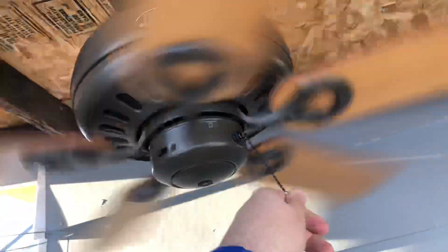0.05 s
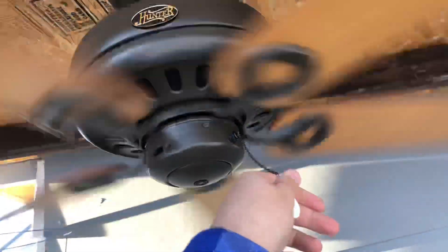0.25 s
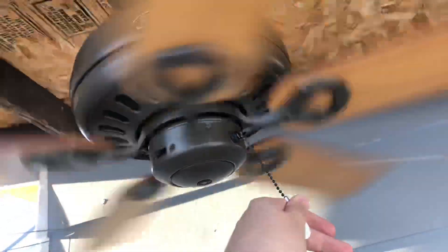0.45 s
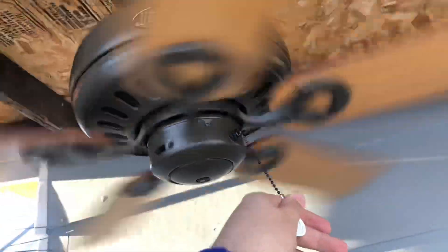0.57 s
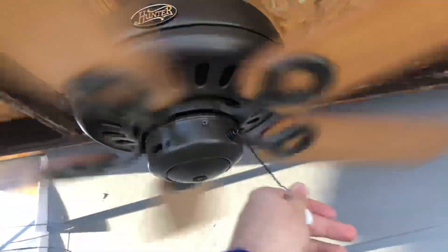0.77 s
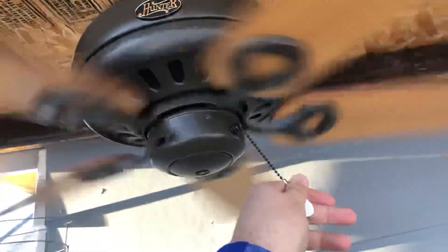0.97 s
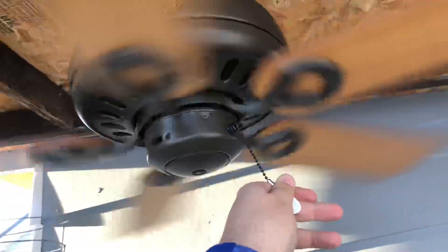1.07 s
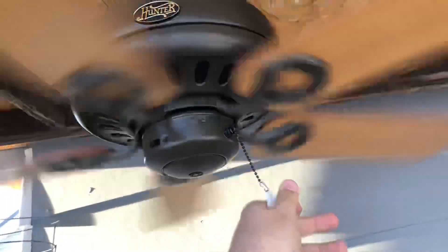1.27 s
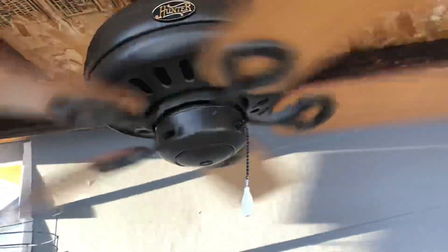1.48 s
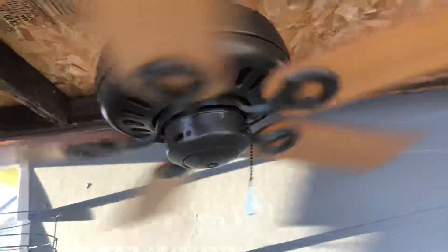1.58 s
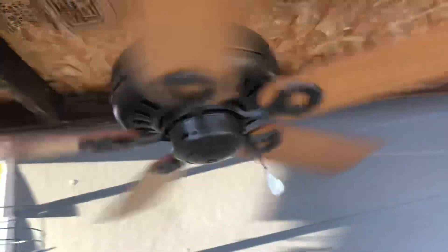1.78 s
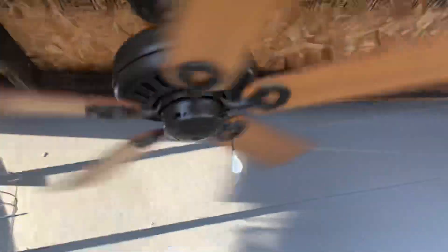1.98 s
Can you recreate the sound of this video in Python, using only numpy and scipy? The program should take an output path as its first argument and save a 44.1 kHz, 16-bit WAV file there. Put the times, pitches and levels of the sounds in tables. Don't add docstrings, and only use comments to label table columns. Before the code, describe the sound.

A ceiling fan's bead pull chain is tugged close by: bright ticks and a hard switch snap at 0.1 s, chain rattling back at 0.33-0.41, ticks from 0.5, the loudest snap near 0.67, another rattle around 0.8, a last snap at 1.03. Low draught buffets the microphone, strongest early, over steady blade hiss. Faint ticks and far bird peeps follow after 1.5, with a soft sleeve brush at 1.9.

```python
import sys
import numpy as np
from scipy import signal
from scipy.fft import irfft
from scipy.io import wavfile
from scipy.ndimage import uniform_filter1d

SR = 44100
rng = np.random.default_rng(int(sys.argv[2]) if len(sys.argv) > 2 else 0)


def materialize(psi):
    bounded = np.clip(np.atleast_2d(psi).T, -1, 1)
    quanta = np.round(bounded * 32767).astype(np.int16)
    wavfile.write(sys.argv[1], SR, quanta)


def decibels_to_gain(level_db):
    exponent = np.asarray(level_db, float) / 20
    return 10 ** exponent


N = 89743


def evened(x):
    return x / np.sqrt(np.mean(x ** 2) + 1e-20)


def read(points, hz):
    f, value = np.transpose(points)
    return np.interp(np.log(hz + 1), np.log(f + 1), value)


def follow(points, t):
    s, value = np.transpose(points)
    return np.interp(t, s, value)


def add(mix, s, sound):
    at = round(s * SR)
    sound = sound[max(-at, 0):]
    part = mix[max(at, 0):][:len(sound)]
    part += sound[:len(part)]


def noise(spectrum, size, patch_db, flicker_db):
    frames, hz = 4 * N // size + 5, np.fft.rfftfreq(size, 1 / SR)
    a, b, patches = rng.standard_normal((frames, len(hz), 3)).T
    patches = uniform_filter1d(patches, size=9, axis=0)
    patches = evened(uniform_filter1d(patches, size=7, axis=1))
    flicker = evened(uniform_filter1d(rng.standard_normal(frames), size=3))
    level_db = read(spectrum, hz)[:, None] + patch_db * patches + flicker_db * flicker
    z = (a + 1j * b) * decibels_to_gain(level_db)
    return evened(signal.istft(z, nperseg=size, noverlap=3 * size // 4)[1][:N])


def eddy(hz, cycles):
    half = max(abs(cycles), 4 / 3) / hz
    t = np.arange(-half, half, 1 / SR)
    swirl = np.cos(2 * np.pi * hz * t)
    bell = np.exp(-8 * (t / half) ** 2)
    balanced = swirl - swirl @ bell / bell.sum()
    return half, np.sign(cycles) * balanced * bell


def small_eddies():
    eddies_per_s = 150
    size = decibels_to_gain(0.74 * np.minimum(rng.exponential(1, N), 3))
    size *= rng.random(N) < eddies_per_s / SR
    size *= rng.choice([-1., 1.], N)
    kind = rng.integers(0, 8, N)
    out = np.zeros(N)
    for k, hz in enumerate(np.geomspace(70, 600, 8)):
        out += signal.oaconvolve(size * (kind == k), eddy(hz, 1.53)[1], "same")
    return evened(out)


# [f/Hz, level/dB per Hz]
LUMP_COLOUR = [(12, -47), (20, 3.5), (76, -2.5), (172, -7), (409, -15), (536, -23), (690, -20), (888, -23),
               (1500, -34.5), (1950, -38.5), (3300, -120)]
# [t/s, level/dB]
DRAUGHT_LEVEL = [(0, -32), (.04, -36.5), (.062, -30.5), (.09, -34.5), (.13, -34), (.15, -27), (.2, -31),
                 (.235, -38.5), (.36, -40), (.4, -34), (.56, -39.5), (.6, -41.5), (1.0, -39.5),
                 (1.2, -40.5), (1.45, -42.5), (1.65, -44.5), (1.76, -41), (2.03, -43.5)]
# [t/s, peak level/dB, f/Hz, cycles (negative = suction)]
STRONG_EDDIES = [(.001, -15.5, 250, -0.56), (0.013, -28.5, 150, -1), (0.053, -22.5, 107, 2.2),
                 (0.0593, -19.5, 372, 0.7), (0.0635, -14.5, 150, 0.5), (.072, -25.5, 102, -0.5),
                 (0.1377, -8.5, 239, -1.5), (0.1475, -20, 483, -2.8), (0.1503, -14.5, 120, 0.5),
                 (.16, -16, 725, 4), (0.1651, -18.5, 226, -1), (.1735, -12.5, 468, 2.34),
                 (0.154, -19, 200, -2.1), (0.1858, -17, 320, -1), (0.2013, -24, 252, -2),
                 (0.2093, -25, 110, -0.3), (0.3999, -23.5, 108, 1.2), (.414, -26.5, 252, 2),
                 (.424, -26, 197, 3), (0.4729, -26, 330, 1), (.477, -26, 450, 1.5),
                 (.481, -21.5, 127, -0.5), (0.507, -30, 200, -2.5), (.523, -29, 130, -0.5),
                 (.538, -31, 483, 3.5), (0.5572, -23.5, 144, -1.7), (0.686, -32.5, 390, 4.5),
                 (0.656, -31, 68.6, 1.5), (0.789, -28, 237, 3.4), (0.825, -25.5, 154, 2.2),
                 (0.939, -24.5, 249, -0.9), (.947, -26, 236, 2.9), (1.051, -32, 251, -1.5),
                 (1.062, -25, 88, 1.5), (1.197, -26.5, 200, 0.5), (1.23, -30, 100, 1.5),
                 (1.654, -37, 340, 5), (1.746, -29, 89, 2), (1.757, -26.5, 205, -1.5),
                 (1.777, -31, 128, -1.9), (1.856, -28.5, 148, 0), (1.913, -30, 195, 1.5),
                 (1.941, -25, 214, 1.8)]


def draught():
    lumps = noise(LUMP_COLOUR, size=2048, patch_db=1.2, flicker_db=-0.5)
    strength = decibels_to_gain(follow(DRAUGHT_LEVEL, np.arange(N) / SR))
    out = strength * (decibels_to_gain(1) * lumps + decibels_to_gain(-6) * small_eddies())
    for s, db, hz, cycles in STRONG_EDDIES:
        half, shape = eddy(hz, cycles)
        add(out, s - half, decibels_to_gain(db) * shape)
    return out


# [f/Hz, level/dB per Hz]
HISS_COLOUR = [(88, -8.5), (150, -3), (293, -2.5), (600, -9.5), (2260, -25), (6940, -36.5), (9500, -41),
               (12500, -49), (16500, -60)]
# [t/s, level/dB]
HISS_LEVEL = [(0, 2), (1.0, 1), (1.4, -0.16), (1.75, 0.25), (2.03, 2)]


def wash():
    hiss = noise(HISS_COLOUR, size=512, patch_db=1.5, flicker_db=0.6)
    return decibels_to_gain(-46.5 + follow(HISS_LEVEL, np.arange(N) / SR)) * hiss


def ringing(modes, t, luck):
    scatter_db, detune = 2, .012
    out = np.zeros(len(t))
    for k, (hz, level_db, t60) in enumerate(modes):
        fade = decibels_to_gain(level_db - 60 * t / t60 + scatter_db * luck[k])
        out += fade * np.sin(2 * np.pi * hz * (1 + detune * luck[20 + k]) * t)
    return out


# [f/Hz, level/dB per Hz]
CRACK_COLOUR = [(1000, 8.5), (2500, -8.5), (4000, 5), (5500, 2), (9000, -1), (11500, -12), (13000, -17),
                (16500, -16.5)]


def hit(modes, knock, crack_db, low_hz, db, chatter_s, knock_db, rattle_db, tilt_db):
    rattle_s, tilt_hz, grit = .012, 6000, 3.5
    t = np.arange(3000) / SR
    contact, luck, rough = np.split(rng.standard_normal(6040), [3000, 3040])
    fade_s = np.clip(chatter_s, 1 / 1000, 1 / 250)
    chatter = contact * np.exp(-t / fade_s) * np.minimum(t / 0.00011, 1)
    rattle = contact * decibels_to_gain(rattle_db) * np.exp(-t / rattle_s) * abs(rough)

    tilted = [(hz, level_db + tilt_db * np.log2(hz / tilt_hz), t60) for hz, level_db, t60 in modes]
    ring = ringing(tilted, t, luck) * (1 - np.exp(-t / fade_s))
    ring *= 1 + grit * uniform_filter1d(rough, size=30)

    hz = np.fft.rfftfreq(256, 1 / SR)
    tilt = tilt_db * np.log2(np.maximum(hz, tilt_hz / 2) / tilt_hz)
    gain = decibels_to_gain(read(CRACK_COLOUR, hz) + tilt) / (1 + (low_hz / (hz + 1)) ** 4)
    colour = np.roll(irfft(gain), 16)[:128]
    crack = signal.fftconvolve(chatter + rattle, colour)[:3000]

    blow = decibels_to_gain(knock_db + 7.5) * ringing(knock, t, luck[10:]) * np.minimum(t / 0.0027, 1)
    return decibels_to_gain(db - 10.5) * (ring / abs(ring).max() + decibels_to_gain(crack_db) * crack / abs(crack).max() + blow)


TICK_TIMES = [.0628, .0962, .218, .265, .4973, .549, .6115, .6539, .744, .9492, .9684, 1.0006, 1.5194,
              1.6544, 1.6854, 1.7894, 1.955, 1.993]
# [peak level/dB, tilt/dB per octave]
TICK_HITS = [(-35.5, 5), (-25, 8), (-59, 0), (-61, -0.5), (-67, 0), (-60, 2), (-37.5, 15), (-30, 6),
             (-51, -3), (-35.5, 13), (-50, 2), (-33, 3), (-47, 5), (-46, 2), (-49, 4), (-54, -1), (-52, 0),
             (-57, -3)]
# [f/Hz, level/dB, time to fade by 60 dB/s]
BEAD_RING = [(5710, 0, .014), (7620, -5, .008), (9000, -9, .004), (11000, -2, .005), (13600, -9, .003)]


def ticks():
    out = np.zeros(N)
    for s, (db, tilt_db) in zip(TICK_TIMES, TICK_HITS):
        add(out, s, hit(BEAD_RING, [], 2, 4340, db, chatter_s=0.0052, knock_db=0,
                        rattle_db=-17, tilt_db=tilt_db))
    return out


SNAP_TIMES = [.104, .1101, .1134, .1295, .6712, .6728, .6915, .7035, .7175, 1.0333, 1.0794]
# [peak level/dB, chatter/s, housing knock level/dB, rattle level/dB, tilt/dB per octave]
SNAP_HITS = [(-37, 0.0026, 0, -27, -19), (-16, 0.00087, -36, -38, 2.5), (-21.5, 0.0046, -3.5, -9, 6),
             (-28, 0.0024, -8, -14, -5), (-16, 0.00067, -5.5, -5, 6.5), (-11, 0.0018, -23, -29, 6),
             (-27.5, 0.0036, -8, -18, -4), (-36.5, .0015, 0, -20, -21), (-49, .0015, -20, -20, -3),
             (-14.5, 0.0035, -5.5, -34, 4.5), (-33, 0.0019, -5, -22, -16)]
# [f/Hz, level/dB, time to fade by 60 dB/s]
CAP_RING = [(2750, -6, .01), (3400, -4, .009), (4050, -5, .008), (5090, 0, .01), (5750, -4, .008),
            (6200, -6, .006), (6850, -2, .007), (7780, -3, .008), (8400, -2, .006), (9230, -10, .005),
            (10900, -9, .006)]
# [f/Hz, level/dB, time to fade by 60 dB/s]
SNAP_HOUSING = [(1180, -6, .02), (1620, -1, .028), (1500, -9, .015), (2000, -10, .012), (2650, -12, .014)]


def snaps():
    out = np.zeros(N)
    for s, row in zip(SNAP_TIMES, SNAP_HITS):
        add(out, s, hit(CAP_RING, SNAP_HOUSING, 5, 860, *row))
    return out


# [f/Hz, time to fade by 60 dB/s]
ECHO_TIME = [(1000, .08), (2000, .09), (4000, .14), (9000, .13), (16000, .09)]


def roof(x):
    blend_turns_per_s = 14
    t = np.arange(SR // 2) / SR
    taps = rng.standard_normal((3, SR // 2)) * np.minimum(t / 0.006, 1)
    hz, frame_t, z = signal.stft(taps, SR, nperseg=256)
    fade = decibels_to_gain(-60 * frame_t / read(ECHO_TIME, hz)[:, None])
    tails = signal.istft(z * fade, SR, nperseg=256)[1]
    wet = signal.fftconvolve(x[None], tails / np.linalg.norm(tails[0]), axes=1)[:, :N]
    turn = 2 * np.pi * (blend_turns_per_s * np.arange(N) / SR + np.arange(3)[:, None] / 3)
    return np.sqrt(2 / 3) * (np.cos(turn) * wet).sum(0)


RETURN_TIMES = [.3308, .3516, .3712, .3755, .3845, .398, .4105, .7801, .7946, .8115, .816, .829, .839,
                1.6398]
# [peak level/dB, chatter/s, housing knock level/dB, rattle level/dB, tilt/dB per octave]
RETURN_HITS = [(-32, 0.0014, -8, -7, 0.5), (-23.5, 0.0016, -13, -8, -0.5), (-24, 0.0036, -4.5, -23, -4),
               (-16.5, 0.0031, -12.5, -23, 9), (-22.5, 0.002, -14, -23, -5), (-39, 0.0017, -16, -18, -14),
               (-39.5, .003, -16, -7, -10), (-25, 0.005, -10, 0, 1.5), (-24, 0.00077, -14, 3, -4.5),
               (-24, 0.00091, -9, -4, -7), (-17.5, 0.0035, -25, -25, 1), (-39.5, .0017, 5.5, -28, -18),
               (-45, 0.0017, -15, -23, -19), (-44, .002, -12, -18, 2)]
# [f/Hz, level/dB, time to fade by 60 dB/s]
LIP_RING = [(2620, -11, .02), (3400, -3, .008), (3960, -1, .009), (4500, -4, .007), (5020, -2, .009),
            (6200, -7, .006), (6850, -6, .006), (7800, -3, .007), (8600, -3, .006), (11000, -2, .008)]
# [f/Hz, level/dB, time to fade by 60 dB/s]
RETURN_HOUSING = [(730, 1.5, 0.024), (934, 0, 0.029), (1174, -6, 0.045), (1652, -12.5, 0.094),
                  (2580, -15, 0.021)]


def chain_returns():
    out = np.zeros(N)
    for s, row in zip(RETURN_TIMES, RETURN_HITS):
        add(out, s, hit(LIP_RING, RETURN_HOUSING, 5, 860, *row))
    return out


# [t/s, length/s, from f/Hz, to f/Hz, level/dB]
BIRD_NOTES = [
    (1.535, .018, 9700, 9600, -74),
    (1.71, .03, 6900, 7200, -79),
    (1.775, .015, 6100, 6100, -76),
    (1.832, .036, 5900, 7200, -72),
    (1.97, .03, 6500, 6500, -80),
]


def birds():
    out = np.zeros(N)
    for s, length, from_hz, to_hz, db in BIRD_NOTES:
        u = np.arange(0, length, 1 / SR) / length
        turns = np.cumsum(from_hz + (to_hz - from_hz) * u ** 0.35) / SR
        add(out, s, decibels_to_gain(db) * 2 * np.sin(np.pi * u) * np.sin(2 * np.pi * turns))
    return out


# [t/s, rise/s, fade/s, level/dB, low f/Hz, high f/Hz]
SLEEVE = (1.921, .004, .018, -49, 1200, 5500)


def rustle():
    s, rise_s, fade_s, db, low_hz, high_hz = SLEEVE
    t, out = np.arange(4000) / SR, np.zeros(N)
    band = signal.butter(3, [low_hz, high_hz], "band", fs=SR)
    cloth = evened(signal.lfilter(*band, rng.standard_normal(4000)))
    add(out, s, decibels_to_gain(db) * cloth * (1 - np.exp(-t / rise_s)) * np.exp(-t / fade_s))
    return out


def scene():
    air = draught() + wash() + birds()
    near = rustle() + ticks() + snaps() + chain_returns()
    return (near + decibels_to_gain(-11) * roof(near) + air)[None]


def low_pass(x):
    return signal.sosfilt(signal.butter(12, 16760, fs=SR, output="sos"), x)


def record(dry):
    soft_start = np.minimum(np.arange(N) / SR / 0.00094, 1)
    x = signal.filtfilt(*signal.butter(2, 46, "high", fs=SR), dry * soft_start)
    treble_edge = signal.firwin(511, 16100, window=("kaiser", 9), fs=SR)
    mix = signal.oaconvolve(x, treble_edge[None], "same")
    return low_pass(mix)


dry = scene()
out = record(dry)
materialize(out)
```